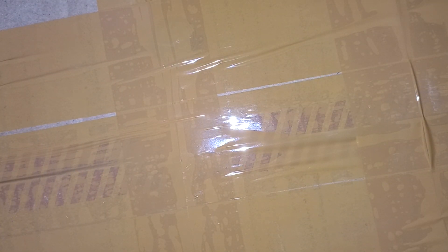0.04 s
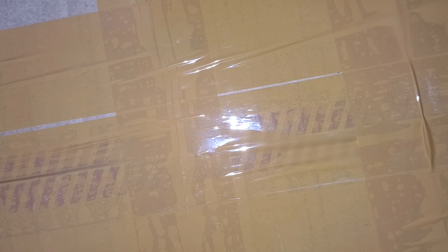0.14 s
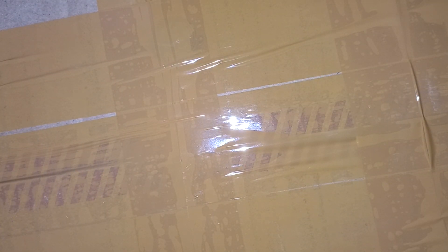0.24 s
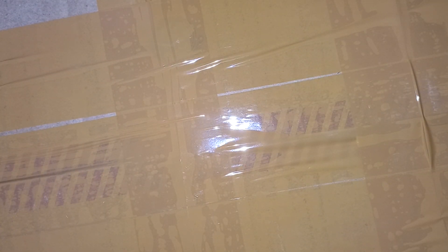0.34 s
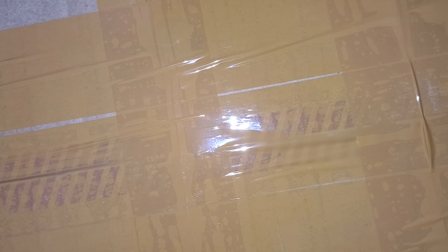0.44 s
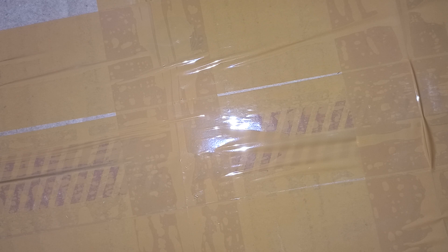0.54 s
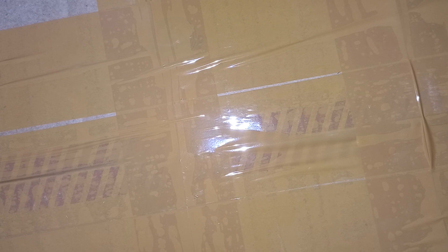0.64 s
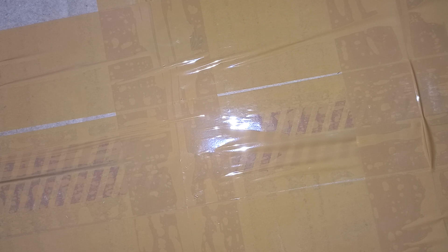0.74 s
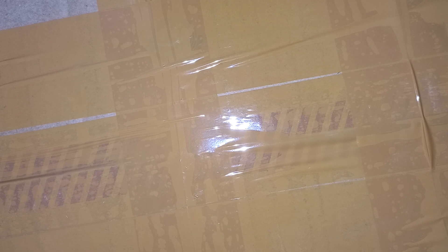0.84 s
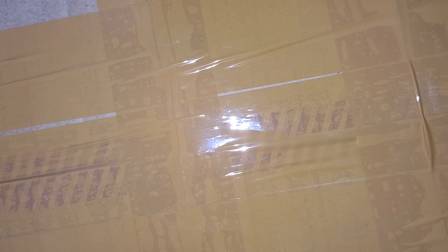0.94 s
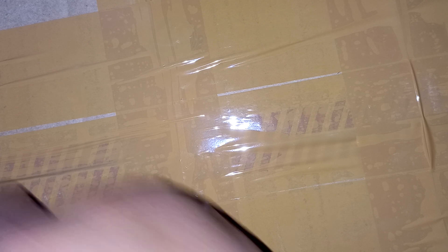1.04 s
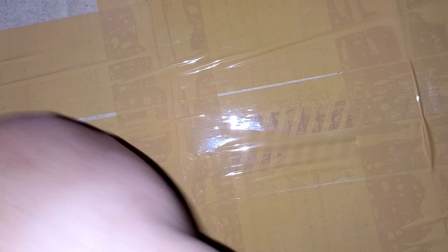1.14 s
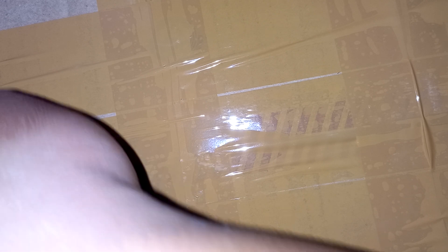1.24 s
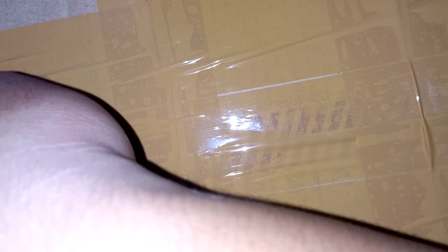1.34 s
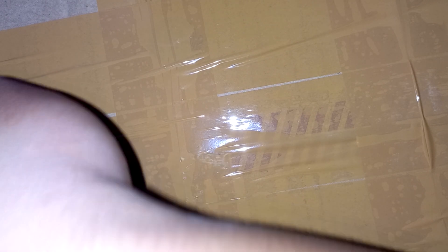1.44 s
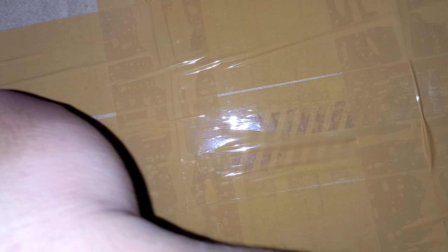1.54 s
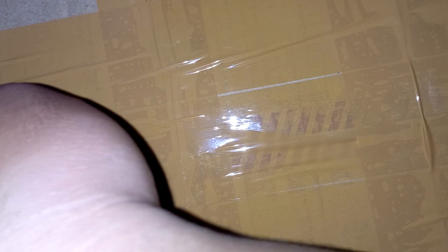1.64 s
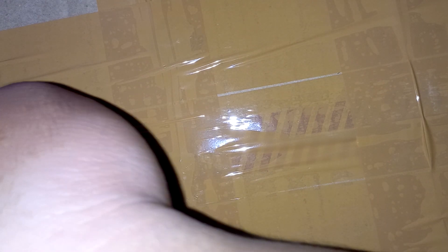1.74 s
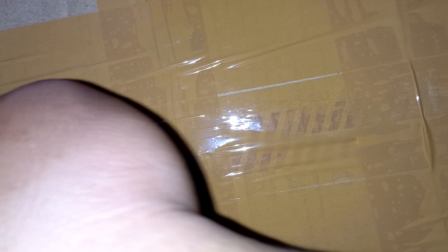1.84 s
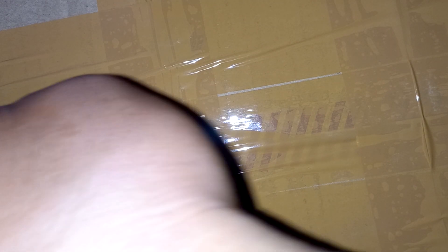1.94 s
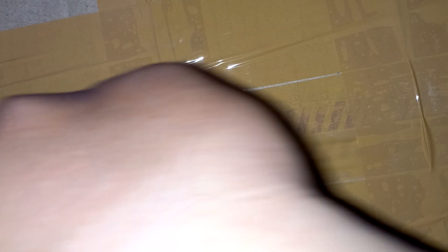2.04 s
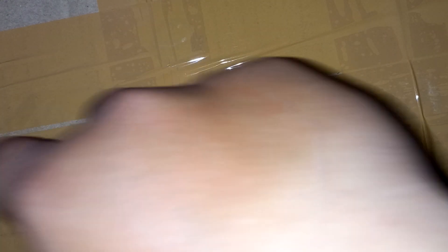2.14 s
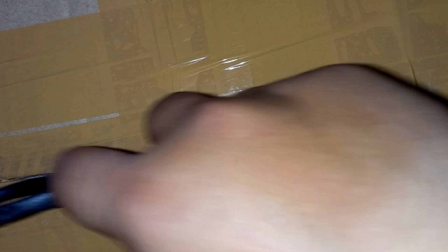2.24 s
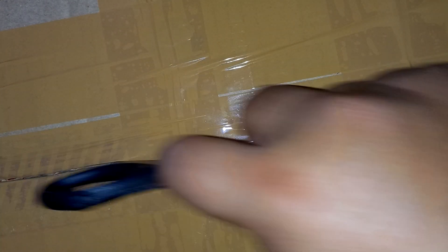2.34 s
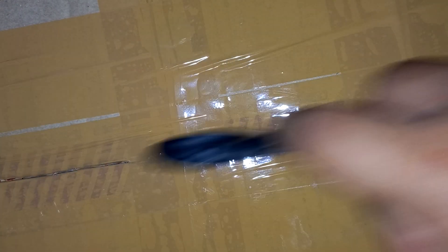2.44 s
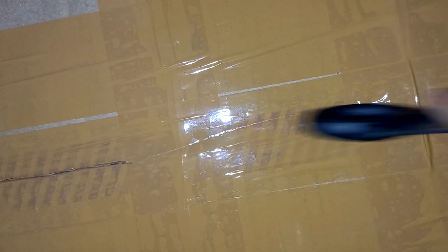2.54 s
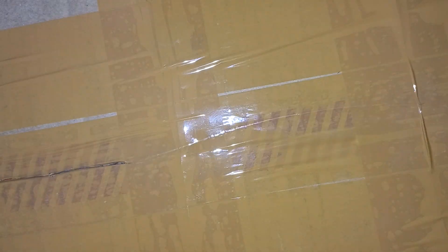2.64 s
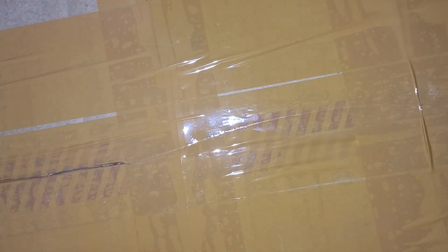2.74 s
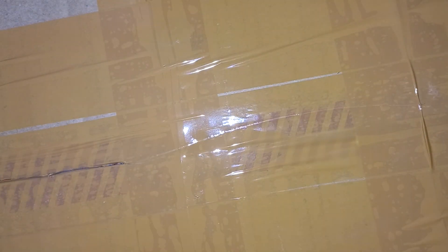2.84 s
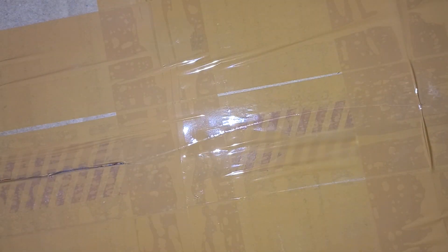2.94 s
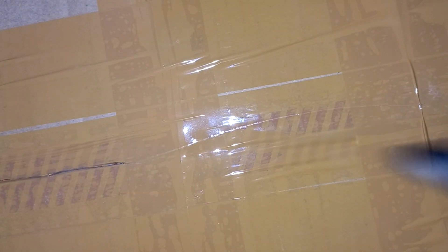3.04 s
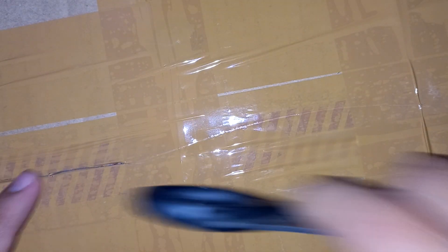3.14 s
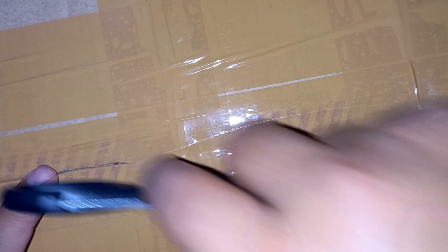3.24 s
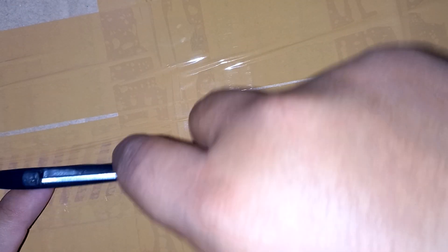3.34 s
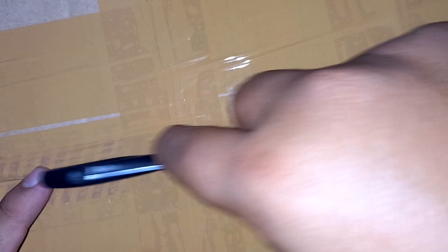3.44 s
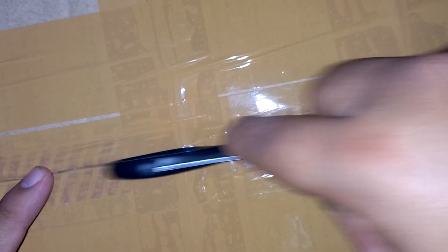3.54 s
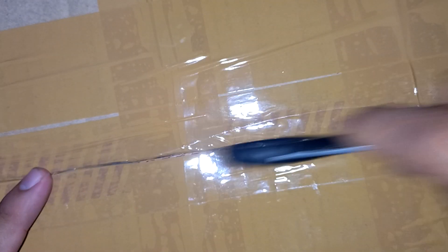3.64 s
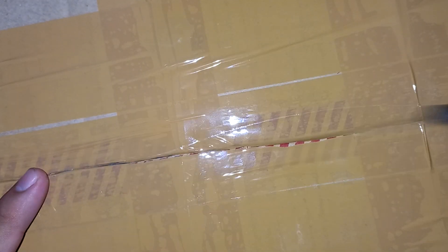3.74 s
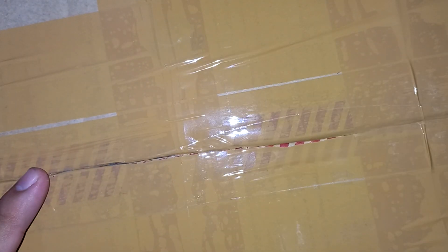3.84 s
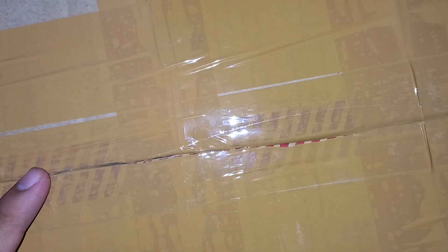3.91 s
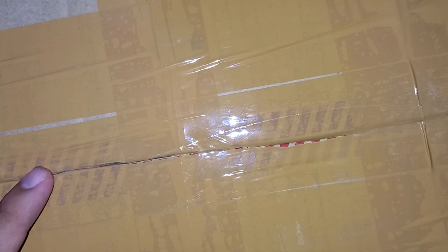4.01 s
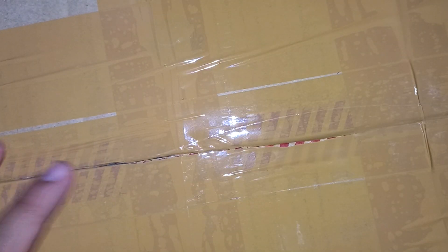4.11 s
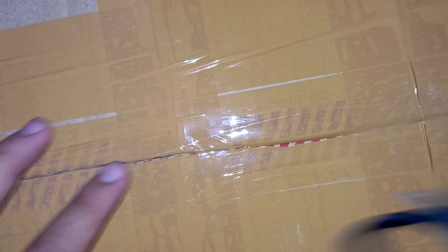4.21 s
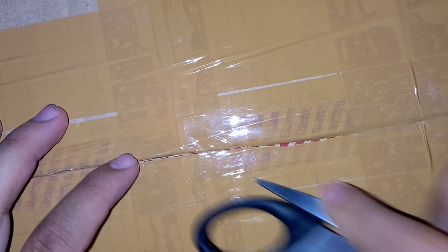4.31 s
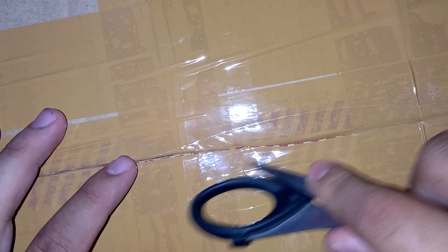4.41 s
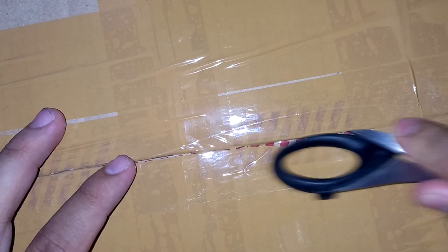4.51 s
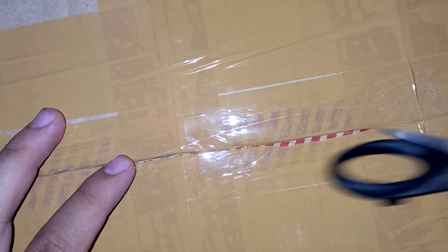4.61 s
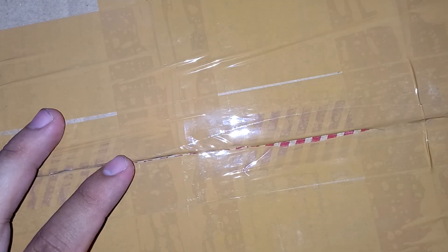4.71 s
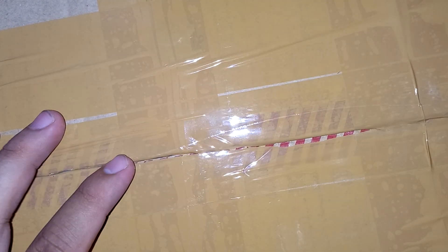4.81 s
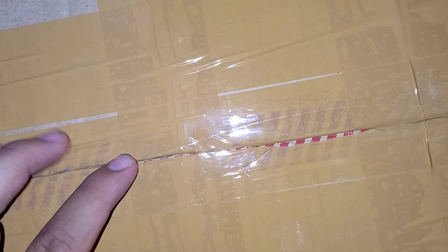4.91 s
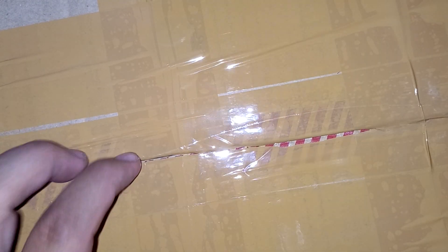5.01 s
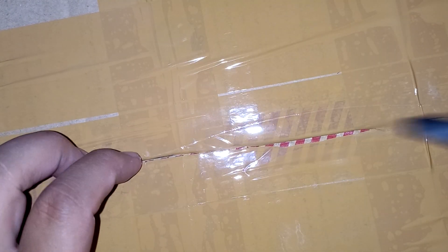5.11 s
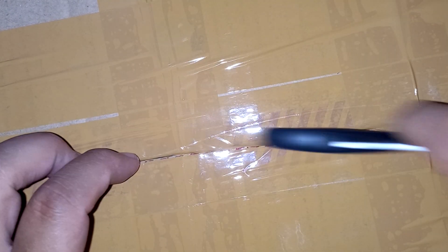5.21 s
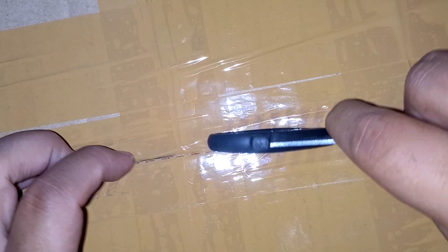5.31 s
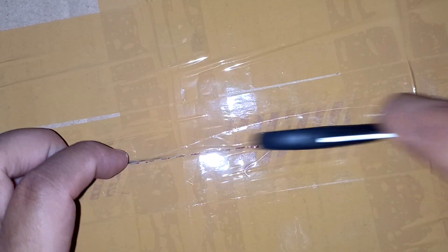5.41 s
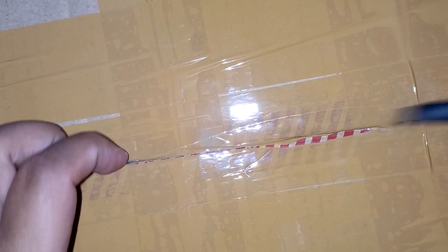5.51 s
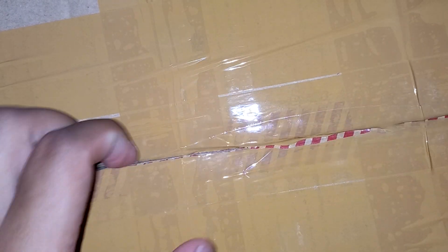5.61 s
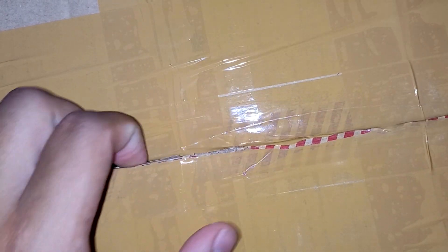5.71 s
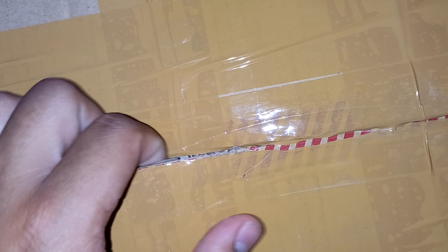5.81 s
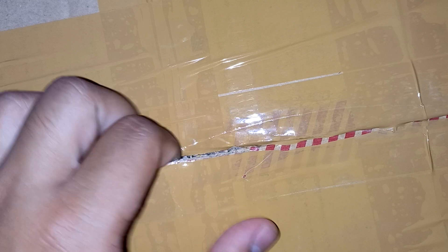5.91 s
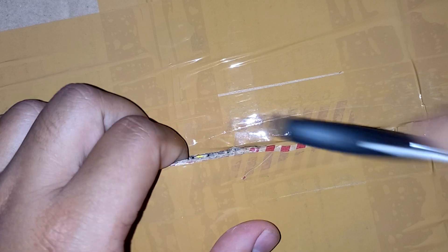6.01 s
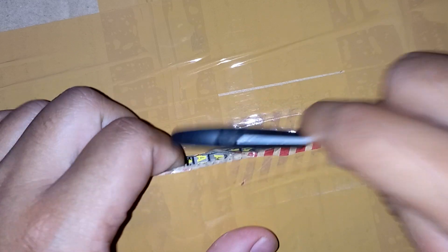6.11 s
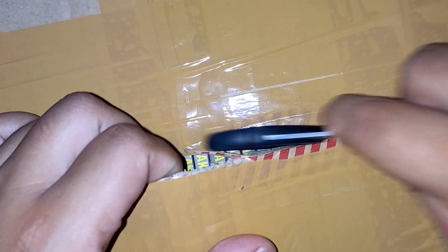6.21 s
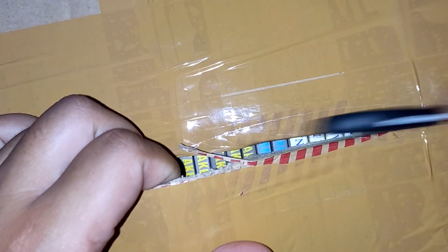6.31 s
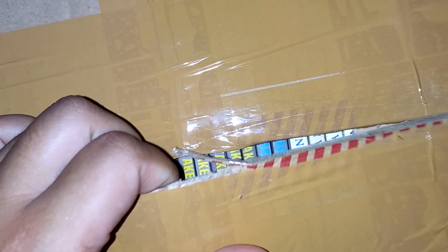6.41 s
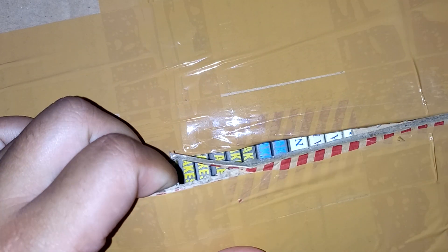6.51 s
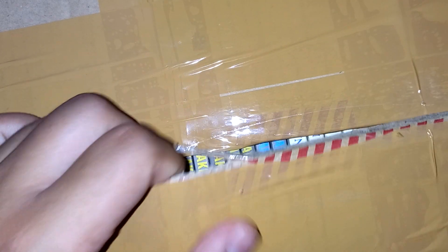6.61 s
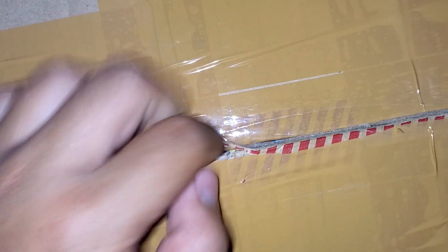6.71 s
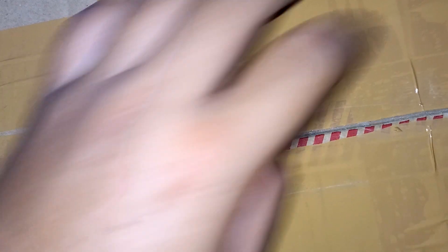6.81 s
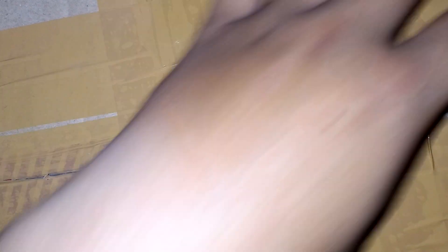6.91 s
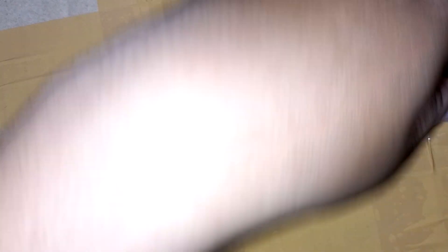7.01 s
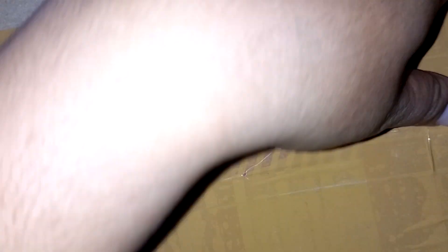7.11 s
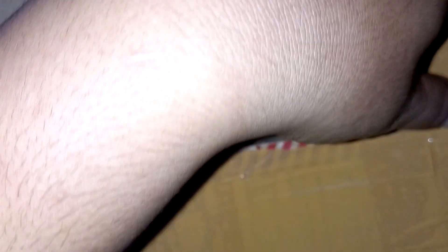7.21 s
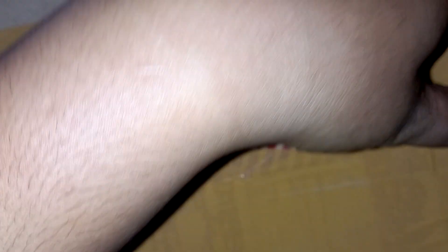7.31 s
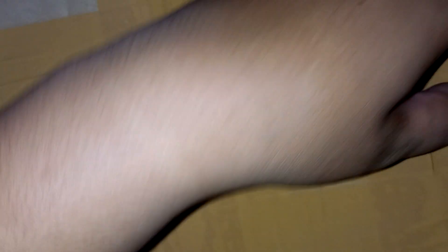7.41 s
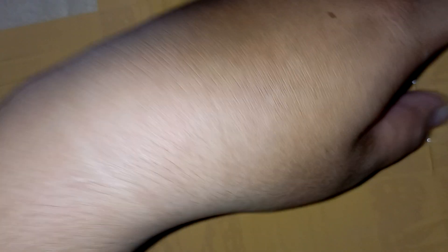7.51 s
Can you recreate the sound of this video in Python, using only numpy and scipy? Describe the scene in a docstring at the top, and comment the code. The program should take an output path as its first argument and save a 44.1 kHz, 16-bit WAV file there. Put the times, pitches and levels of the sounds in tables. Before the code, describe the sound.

Clear packing tape on a cardboard box is slit with a blade in short strokes, sharp crackling snaps and brief rips in a quiet room.

```python
"""A quiet room with near walls: hiss, low rumble and a faint wavering hum, heard by a small microphone close to a box.
A scissor blade slits packing tape along the seam of the cardboard: noise bursts are the snaps of the film.
Each burst drives resonances of film, cut edge, flaps and hollow box; random grains make the drag between snaps.
Damped sines add a few clear notes and falling thumps, and short noise tails answer from the walls."""
import sys
import numpy as np
from scipy import signal
from scipy.fft import rfft, irfft, next_fast_len
from scipy.io import wavfile
from scipy.ndimage import uniform_filter1d, map_coordinates

SR = 44100
rng = np.random.default_rng(int(sys.argv[2]) if len(sys.argv) > 2 else 0)


def wav_record(signal):
    """Record a signal, one row per channel, as 16-bit PCM in the file named by sys.argv[1]."""
    frames = np.transpose(np.atleast_2d(signal))
    bounded = np.clip(frames, -1, 1)
    # unit amplitude maps onto the largest positive 16-bit level
    quanta = np.round(bounded * 32767).astype(np.int16)
    wavfile.write(sys.argv[1], SR, quanta)


N = 333273

# Spectrum of the room's hiss and low rumble: (frequency [Hz], gain [dB])
HISS_SPECTRUM = [(18, -49.5), (30, -25.5), (68, 5), (125, -1), (150, -9), (181, -14), (350, -19),
                 (577, -20), (752, -28), (1000, -12.5), (1660, -16), (1940, -19.5), (2890, -18.5),
                 (15200, -27), (16500, -38.5)]
# Hiss above 160 Hz, before its slight wobble: (time [s], level [dB])
HISS_LEVEL = [(0, -71), (1, -69), (2, -67), (3, -69.5), (4, -69.5), (5.2, -70.5), (6.1, -68), (7.3, -69),
              (7.56, -65.5)]
# Dull band of room noise that comes and goes: (time [s], level [dB])
DULL_LEVEL = [(0, -91), (1.0, -82), (1.5, -74.5), (2.8, -79), (3.1, -89.5), (4.2, -82.5), (5.1, -82),
              (5.3, -108), (6, -78.5), (7.1, -84.5), (7.56, -74.5)]
# Faint hum, before its wobble: (time [s], frequency [Hz], level [dB])
HUM_COURSE = [(0, 129, -72.5), (1, 132, -69.5), (2, 137.2, -75), (3.2, 135.8, -75), (4, 136.5, -79.5),
              (5.2, 127.5, -77), (6.6, 125.2, -74), (7.56, 134.7, -70)]
# Decay of the near walls' answer: (frequency [Hz], time to fall 60 dB [s])
WALL_DECAY = [(300, 0.13), (1400, 0.11), (4000, 0.14), (10000, 0.16), (16000, 0.18)]
# Air and walls of the box: (frequency [Hz], width [Hz], gain [dB])
BOX_MODES = [(105.4, 32, 1.5), (210.4, 65, 6.5), (315, 230, 0.5)]
# Bending modes of the flaps: (frequency [Hz], width [Hz], gain [dB])
FLAP_MODES = [(614.3, 190, -7), (966, 320, -7), (1262, 180, 1), (1660, 480, -10.5)]
# Taut film at the cut edge: (frequency [Hz], width [Hz], gain [dB])
EDGE_MODES = [(1994, 290, 3.5), (2546, 460, 2), (3250, 730, -0.5), (3770, 1400, -14)]
# Bright part of a snap: (frequency [Hz], gain [dB])
FILM_SPECTRUM = [(2500, -47), (3400, -14.5), (3800, 0.5), (5660, 0), (8030, 0), (10500, -5), (12600, -3),
                 (15400, -4.5), (16500, -19)]
# Freed flap thumps as the blade leaves the seam: (time [s], level before onset and decay [dB])
SWOOPS = [(2.768, -17.5), (3.872, -17.5), (5.874, -54)]
# Brief clear note inside some clicks: (time [s], frequency [Hz], level before onset and decay [dB])
PINGS = [(0.67, 1790, -37.5), (6.494, 630, -15), (6.856, 2480, -43), (7.04, 1145, -39)]
# Blade and fingers at work, one list per pass: (time [s], film crackle [dB], cardboard rasp [dB])
WORK_PASSES = [
    [(1.05, -87, -97), (1.166, -94, -63), (1.282, -67, -77), (1.4, -75, -70)],
    [(1.9, -83, -71), (1.994, -69, -74.5), (2.186, -67, -58.5), (2.316, -66, -57.5), (2.43, -68, -58),
     (2.562, -57.5, -50.5), (2.674, -54, -50), (2.764, -45, -54), (2.81, -74, -74), (3.03, -73, -72.5),
     (3.2, -72.5, -73.5)],
    [(3.3, -84, -82), (3.426, -70.5, -67), (3.47, -62, -50), (3.55, -66, -69), (3.602, -53.5, -45.5),
     (3.702, -41, -47), (3.76, -55.5, -47.5), (3.872, -38, -59), (3.912, -72, -66.5), (4.0, -80, -78)],
    [(4.05, -89.5, -87), (4.17, -71.5, -73.5), (4.3, -70, -71.5), (4.484, -90.5, -77.5), (4.546, -52, -61),
     (4.68, -60.5, -67.5), (4.75, -49, -47), (4.81, -55, -61), (4.845, -64, -63), (4.89, -48, -59),
     (4.95, -73, -71.5), (5.134, -72.5, -70), (5.2, -82.5, -91)],
    [(5.3, -84, -94.5), (5.37, -65.5, -71.5), (5.5, -72, -65.5), (5.53, -53, -58.5), (5.6, -51.5, -43),
     (5.688, -52, -54.5), (5.756, -88, -70.5), (5.866, -58, -61), (5.96, -68, -64), (6.05, -77, -67)],
    [(6.1, -83, -86), (6.2, -63, -61), (6.318, -55, -49), (6.378, -49, -44), (6.496, -44, -39),
     (6.55, -87, -87), (6.76, -58, -57.5), (6.87, -60.5, -55), (6.9, -78, -70.5), (7.048, -63.5, -65),
     (7.17, -73, -96), (7.426, -80, -75), (7.557, -64, -68)],
]
# Short runs of tearing: (middle [s], length [ms], rasp at the middle [dB], push on the box there [dB])
RIPS = [(1.168, 33, -65.5, -60), (1.255, 9.3, -62, -52), (2.247, 11.5, -37, -31), (2.351, 22, -52.5, -49),
        (2.388, 21, -46, -47), (2.417, 10.7, -41.5, -43.5), (2.473, 10, -54, -44.5), (2.543, 59, -48, -42),
        (2.769, 14.2, -29.5, -38.5), (2.635, 24, -59, -66), (2.7, 21, -56, -56), (2.797, 25, -51.5, -59),
        (3.451, 17, -46, -40.5), (3.533, 9.3, -45.5, -48.5), (3.583, 40, -42.5, -41), (3.644, 18, -50, -39),
        (3.665, 25, -42.5, -33.5), (3.705, 9.4, -35, -35.5), (3.813, 26, -55, -45.5),
        (3.848, 62, -42.5, -50.5), (3.883, 10, -45, -41), (4.17, 26, -66, -65), (4.432, 26, -59.5, -50),
        (4.533, 33, -46.5, -43), (4.584, 31, -51.5, -50), (4.723, 11.4, -30, -64), (4.751, 26, -35.5, -53),
        (4.784, 30, -41, -54.5), (4.868, 22.6, -45, -68), (5.073, 36, -68, -57), (5.362, 19, -61.5, -50.5),
        (5.535, 20, -57, -61), (5.674, 23, -38, -44), (6.188, 13, -47, -53), (6.229, 16, -38.5, -43.5),
        (6.275, 29, -46, -45.5), (6.369, 18.5, -42.5, -38.5), (6.438, 31.4, -31.5, -48),
        (6.472, 19, -38, -58), (6.502, 8.7, -26.5, -43), (6.515, 22, -42.5, -44.5), (6.863, 31, -69, -52.5)]
# Snaps of film, knocks of blade or finger:
# (time [s], film peak [dB], then relative to it: cut edge [dB], flap ring [dB], box thump [dB])
SNAPS = [(0.6683, -17, -28, -35.5, -45), (0.6854, -34.5, -27, -33, -44), (0.857, -52, -6, -20, -32),
         (1.0993, -51, -6, -11, -18), (1.12, -46.5, -7, 0.5, -7), (1.231, -43, -9, -20, -24),
         (1.2415, -35.5, -5.5, -2.5, -11.5), (1.2621, -28, -8.5, -25, -35), (1.4128, -45.5, -21, -28, -31),
         (1.606, -45.5, -12, -8.5, -20), (1.9083, -43, -30, -36, -34), (1.9556, -8.5, -18.5, -18.5, -71),
         (2.052, -37, -9, -6, -42), (2.134, -40.5, 4, 5, -4), (2.169, -38, -0.5, 8.5, -6),
         (2.2224, -3.5, -8, -6, -23.5), (2.3317, -43, -2, -1, -10), (2.3457, -37, -6, 3, -1.5),
         (2.358, -32, -10, -6, -19), (2.37, -34, -6, -12, -20), (2.384, -29, -4, -2, -10),
         (2.3927, -29, -9, -14, -15), (2.4153, -21, -33, -10, -20), (2.483, -34.5, -10, -2.5, -10),
         (2.6313, -34.5, -4, -3.5, -32), (2.6577, -32, -6, -22, -32), (2.722, -31, -5, -22, -33),
         (2.736, -17, -37, -27, -42), (2.7572, -10, -21, -34, -34), (2.9002, -44, -11.5, -27, -27),
         (3.0752, -39, -20, -38, -44), (3.3703, -39, -0.5, 4, 0.5), (3.38, -44, -17, -20, -31),
         (3.4447, -26, -6, -8, -20), (3.519, -35.5, -5, -1, -12), (3.5644, -29.5, -19, -7, -9),
         (3.5724, -27.5, 8, 4, 0), (3.597, -38.5, -14, 7, 8.5), (3.605, -20, -31, -26, -29),
         (3.6428, -35.5, 4, -1, 6.5), (3.661, -45, -8, -5, 17), (3.6725, 1.5, -15.5, -21, -33),
         (3.7729, -24.5, -22, -23, -29.5), (3.8066, -30, 1, 3, -19), (3.8216, -12.5, -1.5, -3, -31),
         (3.8691, -6.5, -7, -11, -27), (4.1463, -57, -12, 0, 1), (4.175, -52.5, -16, 3, -25.5),
         (4.416, -50.5, -3, 14.5, 13.5), (4.4477, -38, -5, -6.5, -8), (4.4765, -52.5, 3, 6, 4),
         (4.5268, -39, 10.5, 4, 3), (4.535, -44.5, -5, -7, 13.5), (4.5462, -27.5, -0.5, 0, -11),
         (4.581, -19, -13, -9, -23), (4.6253, -34.5, -12, -21, -40), (4.658, -35.5, -2, -12, -26),
         (4.6775, -14.5, -7, -9, -49), (4.704, -23, -24, -29, -40), (4.718, -19, -5, -13, -43),
         (4.752, -27, -1, -17, -22.5), (4.8557, -34.5, -2, -18, -28), (4.8664, -21.5, -16, -26, -37),
         (4.9068, -22, -23, -40, -48), (4.9747, -32, -19, -29, -41), (5.0672, -48, -20, 9, -7),
         (5.123, -51.5, -4, -7, -27), (5.1503, -39.5, -13, -20.5, -42.5), (5.3534, -46.5, -17.5, 7.5, 1),
         (5.4405, -41, -14, -19, -30.5), (5.456, -36, -27, -32, -34), (5.5161, -9.5, -9, -10, -53),
         (5.5661, -20.5, 0, 3, -24), (5.6385, -33.5, -8, -10, -8), (5.6644, -20, -8.5, -13, -17),
         (5.6821, -26, 1.5, -2, -12), (5.7035, -25.5, -19, -19, -43), (5.748, -39, -9, -16, -38),
         (5.777, -43, -5, -14, -29), (5.7904, -57, 12, -1, -19), (5.832, -38.5, -6, -4.5, -25),
         (5.845, -33, -15, -23, -29), (5.8734, -19, -7.5, -9.5, -28), (5.9092, -33, -16, -31, -38),
         (6.014, -59.5, -9, 10, -17), (6.1427, -22, -6.5, -3.5, -42), (6.1536, -25, -3, -7.5, -24),
         (6.179, -21.5, -7, -6.5, -43), (6.201, -34, -6, 3, -1), (6.222, -15, -4, -2.5, -19),
         (6.2357, -27, -6, 4, -4), (6.2494, -10, -5, -4, -21), (6.3286, -26, -18, -23, -16),
         (6.3575, -32, 4, 4, -11), (6.4728, -25, 0.5, -1, -18), (6.496, -32, 4, 2, -6),
         (6.5038, -17.5, -5, -10, -28), (6.578, -44, -25, -23, -31), (6.6072, -39, -36, -36, -30),
         (6.647, -45, -8, -0.5, -10.5), (6.685, -37, -13, -17, -23), (6.7113, -40, -13, -22, -34),
         (6.7486, -44, -12, -19, -27), (6.7891, -46, 1, 10, 0), (6.8062, -32.5, -23, -15, -12.5),
         (6.853, -48, -10, 9.5, -7), (6.8625, -26, -20, -8.5, -38), (6.9055, -38, -22, -36, -33),
         (6.9578, -28.5, -26, -40, -41), (6.996, -54, -10, 5, -6), (7.0423, -55, -17, -1, -1),
         (7.223, -40.5, -24, -37.5, -23.5), (7.3893, -45, -27, -27, -21), (7.3983, -42, -29, -34, -32),
         (7.5198, -33.5, -8, -17, -25), (7.528, -36.5, -2, -22, -29)]

FADE_FROM_HZ, TOP_HZ, CEILING_HZ = 15800, 16300, 16950
PING_T60_S, SWOOP_T60_S = 0.022, 0.038
RUMBLE_DB = -7.5  # shaking of the box, relative to the rasp
RIP_CRACKLE_DB = -3.5  # film crackle of a rip, relative to its rasp
PUSH_DULLS = 0.54  # dB of rip crackle lost per dB that the push exceeds the rasp
# stray ticks: least peak over the crackle, scatter, loudest peak
TICK_DB, TICK_SPREAD_DB, TICK_TOP_DB = 15.5, 5, -34
TICK_EDGE_DB, TICK_FLAP_DB, TICK_BOX_DB = -9.5, -17.5, -30  # relative to the tick's film peak
# brightest pitch of a snap: higher the less the cut edge rings, with a random scatter
BRIGHT_HZ, OCTAVES_PER_DB, SCATTER_OCTAVES = 5200, .02, 0.18
TEAR_MS, TEAR_MS_PER_DB = 5.63, -0.08  # time to fall 20 dB at a 0 dB film peak; weaker snaps tear longer
BREAK_DB, BREAK_GROWS = 19, .05  # first break over the tear at a 0 dB film peak; weaker snaps break softer


def amp(db):
    """Decibels to amplitude."""
    return 10 ** (np.asarray(db) / 20)


def unit(x):
    """x scaled to an RMS of one."""
    return x / np.sqrt(np.mean(x ** 2) + 1e-20)


def even(x, seconds):
    """x with its level held steady over the given time."""
    power = np.abs(uniform_filter1d(x ** 2, round(seconds * SR)))
    return x / np.sqrt(power + 1e-20)


def along(points, hz):
    """Reads (frequency [Hz], value) points on a log frequency axis."""
    f, v = np.transpose(points)
    return np.interp(np.log(hz + 1), np.log(f + 1), v)


def curves(rows):
    """One value per sample for each column after the time."""
    s, *cols = np.transpose(rows)
    return [np.interp(np.arange(N) / SR, s, c) for c in cols]


def wobble(rate):
    """A smooth random curve, rate knots a second."""
    knots = rng.standard_normal(int(N * rate / SR) + 4)
    return map_coordinates(knots, [np.arange(N) * rate / SR])


def filtered(x, response):
    """x passed through a complex response of frequency."""
    n = x.shape[-1]
    m = next_fast_len(n + 4096)
    return irfft(rfft(x, m) * response(np.fft.rfftfreq(m, 1 / SR)), m)[..., :n]


def modes(table):
    """Causal response of a set of resonances, neighbours in opposite sign."""
    def response(f):
        total = 0
        for k, (centre, width, db) in enumerate(table):
            resonance = 1j * f * width / (centre * centre - f * f + 1j * f * width)
            total = total + (-1) ** k * amp(db) * resonance
        return total
    return response


def room():
    """Shaped noise gives hiss and low rumble, resonant noise a dull band, a wavering sine the faint hum."""
    hiss = filtered(rng.standard_normal(N), lambda hz: amp(along(HISS_SPECTRUM, hz)))
    above = filtered(hiss, lambda hz: hz > 160)  # sets the level without the rumble
    hiss = hiss / np.std(above) * amp(curves(HISS_LEVEL)[0] + .4 * wobble(3.4))
    dull_modes = modes([(520, 90, 0), (760, 300, -2)])
    dull = filtered(rng.standard_normal(N), lambda hz: dull_modes(hz) ** 2)
    dull = amp(curves(DULL_LEVEL)[0]) * unit(dull)
    hz, db = curves(HUM_COURSE)
    phase = 2 * np.pi * np.cumsum(hz + 0.61 * wobble(24.0)) / SR
    hum = np.sqrt(2) * amp(db + 1.5 * wobble(8.3)) * np.sin(phase)
    return hiss + dull + hum


def walls(x):
    """Short answer of the near walls; a new tail every quarter second as hands and blade move."""
    out, step = np.zeros(N + SR), SR // 4
    delay = 130  # samples, about 3 ms
    for a in range(0, N, step):
        hz, t, z = signal.stft(rng.standard_normal(SR // 4), SR, nperseg=128)
        decay = amp(-60 * t / along(WALL_DECAY, hz)[:, None])
        tail = signal.istft(z * decay, SR, nperseg=128)[1]
        y = signal.fftconvolve(x[a:a + step], tail / np.linalg.norm(tail))
        out[a + delay:a + delay + len(y)] += y
    return out[:N]


def box(hz):
    """Box resonances; heavy walls do not follow fast pushes."""
    return modes(BOX_MODES)(hz) / (1 + 1j * hz / 450) ** 2


def edge(hz):
    """Cut edge resonances; the narrow strip of film radiates little below its first mode."""
    return modes(EDGE_MODES)(hz) * (1j * hz / (1500 + 1j * hz)) ** 2


def film(hz):
    """Bright spectrum of the breaking film."""
    return amp(along(FILM_SPECTRUM, hz))


def swoop():
    """Bending waves spread out, high ones first, so the thump glides from 1110 Hz down to the 210 Hz box note."""
    s, db = np.transpose(SWOOPS)[..., None]
    t = np.maximum(np.arange(N) / SR - s, 0)
    cycles = 210 * t + 900 * 0.00402 * (1 - np.exp(-t / .004))
    envelope = amp(db - 60 * t / SWOOP_T60_S) * (1 - np.exp(-t / 0.0086))
    return np.sum(envelope * np.sin(2 * np.pi * cycles), 0)


def ping():
    """Damped notes with a soft start."""
    s, hz, db = np.transpose(PINGS)[..., None]
    t = np.maximum(np.arange(N) / SR - s, 0)
    envelope = amp(db - 60 * t / PING_T60_S) * (1 - np.exp(-t / 0.0014))
    return np.sum(envelope * np.sin(2 * np.pi * hz * t), 0)


def effort():
    """Gains of crackle, rasp and rumble: the slow drag of the blade plus a swell for each short rip."""
    rows = []
    for table in WORK_PASSES:  # silence around each pass
        rows += [(table[0][0] - .01, -110, -110), *table, (table[-1][0] + .02, -110, -110)]
    crackle_db, rasp_db = curves(rows)
    power = amp([crackle_db, rasp_db, rasp_db + RUMBLE_DB]) ** 2
    t = np.arange(-SR // 10, SR // 10)
    for s, ms, rip_db, push_db in RIPS:
        at = np.clip(round(s * SR) + t, 0, N - 1)
        rip_crackle_db = rip_db + RIP_CRACKLE_DB - PUSH_DULLS * max(push_db - rip_db, 0)
        swell = np.exp(-np.abs(t / SR / (ms / 2000)) ** 3)
        power[:, at] += amp([[rip_crackle_db], [rip_db], [push_db]]) ** 2 * swell
    return np.sqrt(power)


def grains(rate, spread_db, clump_db):
    """Tiny breaks at random moments, rate a second: most small, a few large, in clumps."""
    breaks = (rng.random(N) < rate / SR) * rng.standard_normal(N)
    size_db = spread_db * rng.exponential(size=N) + clump_db * wobble(90)
    return breaks * amp(np.minimum(size_db, 24 + 0 * size_db))


def patchy(x, depth_db):
    """Gives grains their own colour: random gain in small patches of time and frequency."""
    z = signal.stft(x, nperseg=128)[2]
    field = uniform_filter1d(rng.standard_normal(z.shape), 7, 0)
    field = uniform_filter1d(field, 3, 1)
    return unit(signal.istft(z * amp(depth_db * unit(field)), nperseg=128)[1][:N])


def drag():
    """The film crackles in fine grains; the same grains rasp the flaps, and a little later the push shakes the box."""
    crackle, rasp, rumble = effort()
    breaks = unit(grains(4500, spread_db=3, clump_db=3.0)) + 0.37 * rng.standard_normal(N)
    bright = filtered(breaks, lambda hz: film(hz) + 0.25 * edge(hz))
    rubbing = breaks + 0.83 * rng.standard_normal(N)
    flaps = filtered(rubbing, lambda hz: modes(FLAP_MODES)(hz) + 0.34 * edge(hz))
    shake = even(filtered(rng.standard_normal(N), box), .03)
    late_rumble = np.pad(rumble, (round(0.0023 * SR), 0), "edge")[:N]
    bright = even(patchy(bright, depth_db=4.5), 0.055)
    flaps = even(patchy(flaps, depth_db=3.5), 0.02)
    return crackle * bright + rasp * flaps + late_rumble * shake


def ticks(count):
    """Stray small snaps at random moments, scaled to the crackle around them; rows as in SNAPS."""
    when, size = rng.random((count, 2)).T
    s = .02 + when * (N / SR - .1)
    crackle_db = 20 * np.log10(effort()[0][(s * SR).astype(int)])
    peak_db = crackle_db + TICK_DB - TICK_SPREAD_DB * np.log(size + 1e-3)
    peak_db = np.minimum(peak_db, TICK_TOP_DB)
    return [(at, db, TICK_EDGE_DB, TICK_FLAP_DB, TICK_BOX_DB) for at, db in zip(s, peak_db)]


def snaps():
    """A sharp break and a short dying tear drive film, edge, flaps and box, each at its own strength."""
    s, peak_db, edge_db, flap_db, box_db = np.transpose([*SNAPS, *ticks(count=60)])
    tear_ms = np.clip(TEAR_MS + TEAR_MS_PER_DB * peak_db, 1, 40)[:, None]
    octaves = SCATTER_OCTAVES * rng.standard_normal(len(s)) - OCTAVES_PER_DB * edge_db
    bright_hz = BRIGHT_HZ * 2 ** octaves[:, None]
    t = np.arange(-64, 2048) / SR
    after = t - .0008  # the film creaks for a moment before it breaks
    shape_db = np.where(after < 0, 30000 * after - 6, -20 * 1000 * after / tear_ms)
    tear = rng.standard_normal(shape_db.shape) * amp(shape_db)
    tear[:, np.searchsorted(after, 0)] += amp(BREAK_DB + BREAK_GROWS * peak_db)  # the sharp first break

    def tinted_film(hz):
        return film(hz) * amp(-3.5 * np.log2((hz + 1) / bright_hz) ** 2)

    def late_box(hz):
        return box(hz) * np.exp(-2j * np.pi * hz * .0015)  # slow bending waves reach the walls later

    parts = [(tinted_film, 0 * s), (edge, edge_db), (modes(FLAP_MODES), flap_db), (late_box, box_db)]
    sound = 0
    for response, rel_db in parts:
        part = filtered(tear, response)
        part = part / np.abs(part).max(1, keepdims=True)
        sound = sound + part * amp(peak_db + rel_db)[:, None]
    out = np.zeros(N + SR)
    starts = np.round((s + t[0]) * SR).astype(int)
    for start, row in zip(starts, sound):
        out[start:start + len(row)] += row
    return out[:N]


def scene():
    """The work at the box close by, its answer from the near walls, and the room behind."""
    work = snaps() + ping() + swoop() + drag()
    return (work + amp(-13) * walls(work) + room())[None]


def record(dry):
    """The microphone drops deep bass; the recorder fades above its band limit and keeps nothing over the ceiling."""
    def response(hz):
        fade = amp(-22 * np.clip((hz - FADE_FROM_HZ) / (TOP_HZ - FADE_FROM_HZ), 0, 1))
        bass_cut = hz ** 5 / (hz ** 5 + 56 ** 5)
        return fade * (hz < CEILING_HZ) * bass_cut
    return filtered(dry, response)


dry = scene()
out = record(dry)
wav_record(out)
```